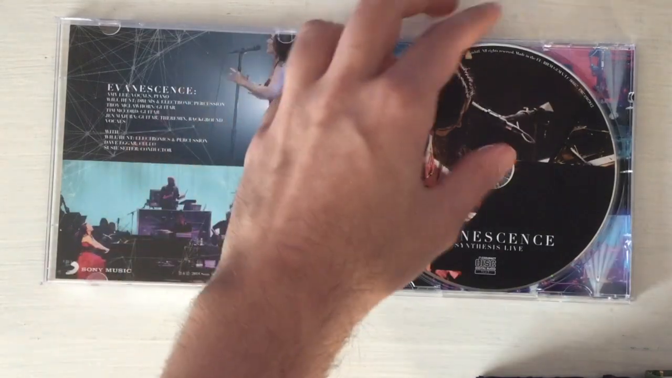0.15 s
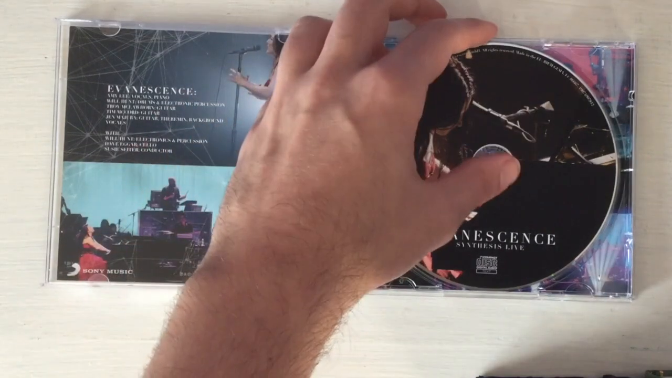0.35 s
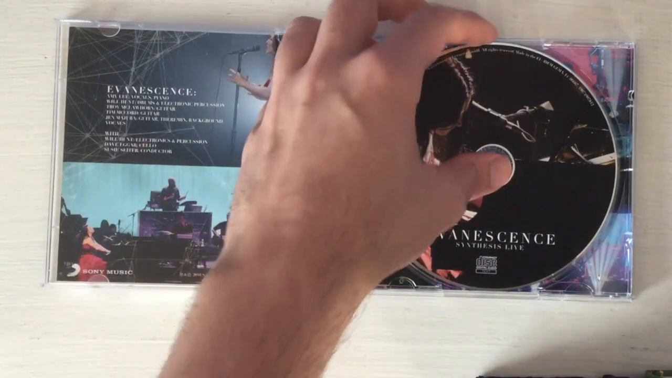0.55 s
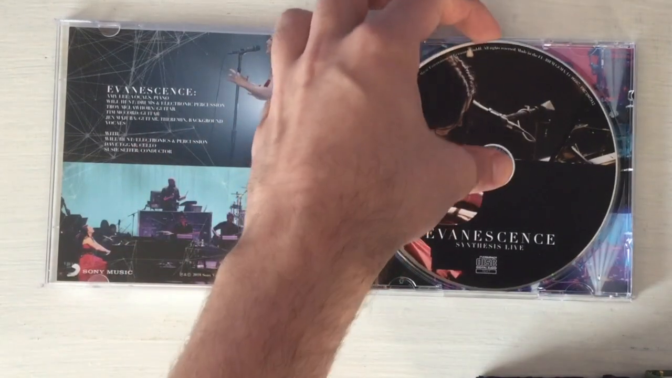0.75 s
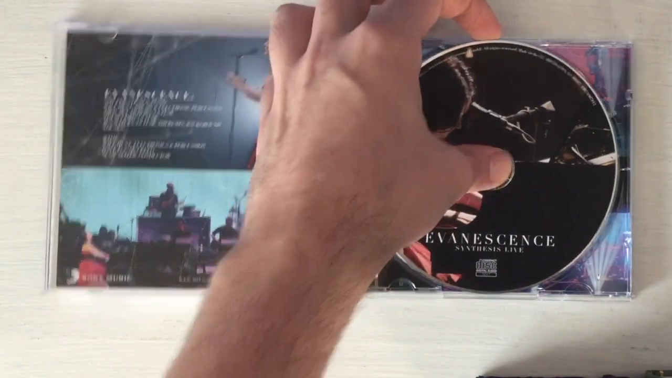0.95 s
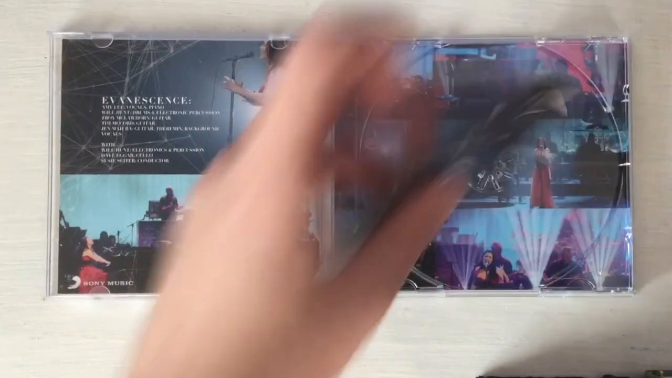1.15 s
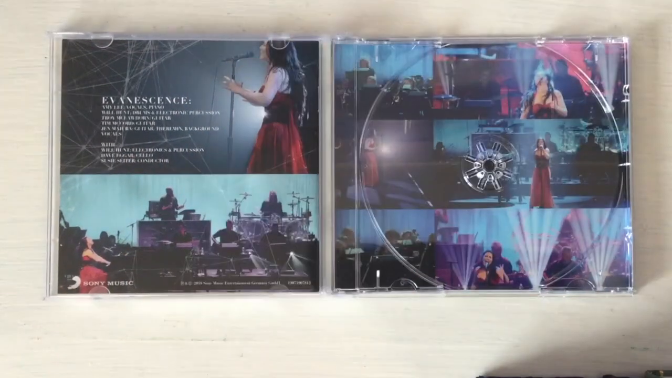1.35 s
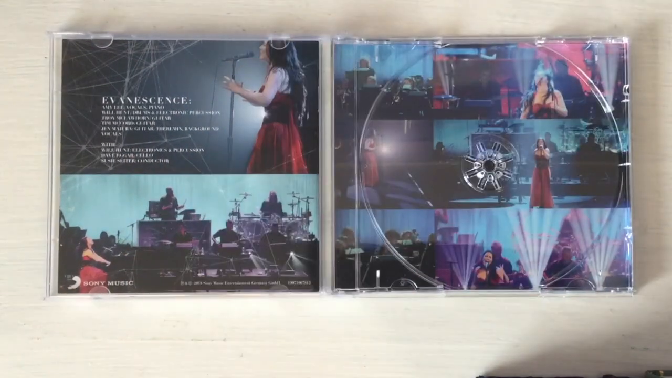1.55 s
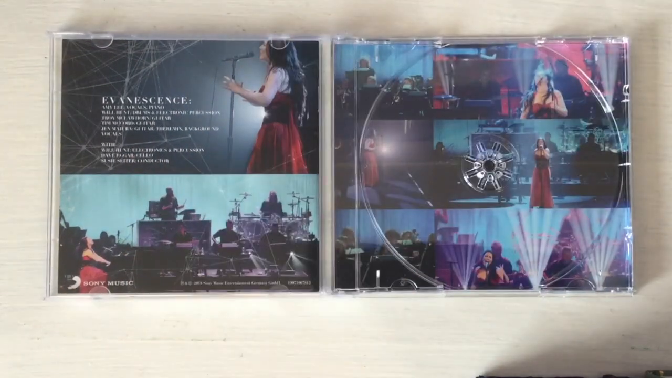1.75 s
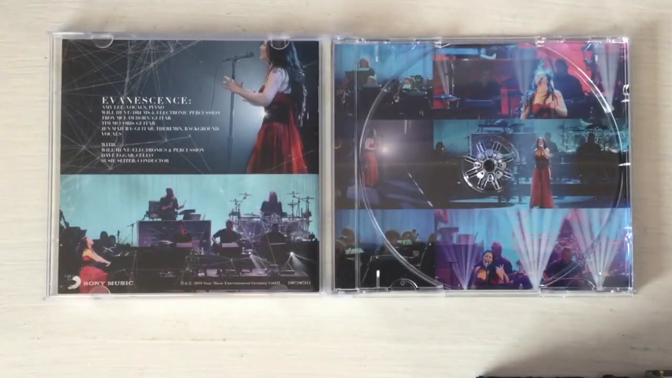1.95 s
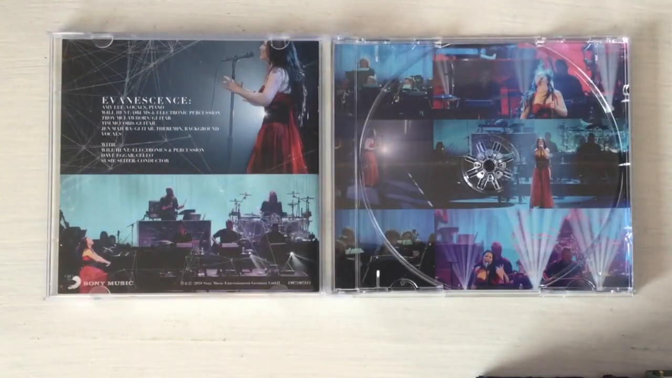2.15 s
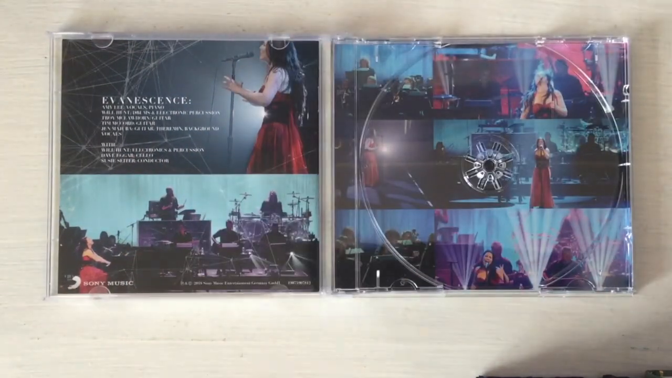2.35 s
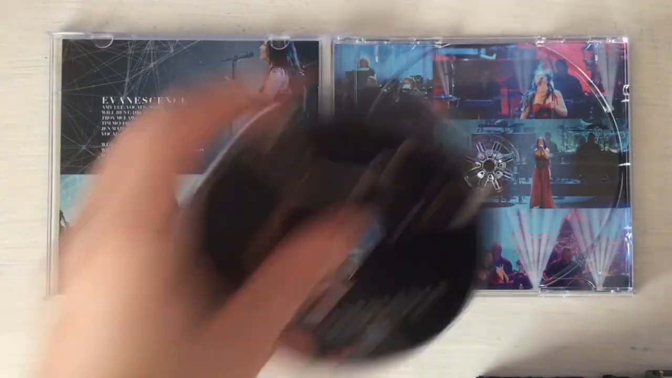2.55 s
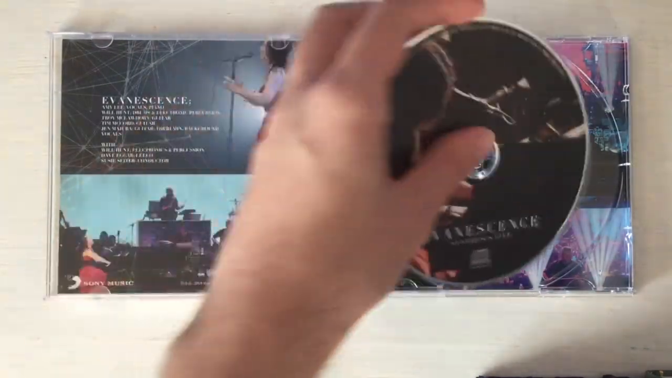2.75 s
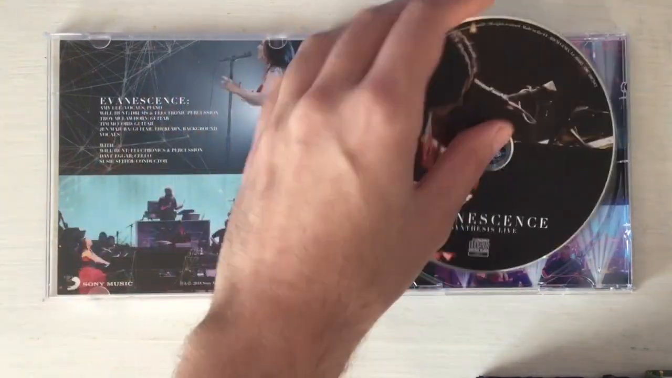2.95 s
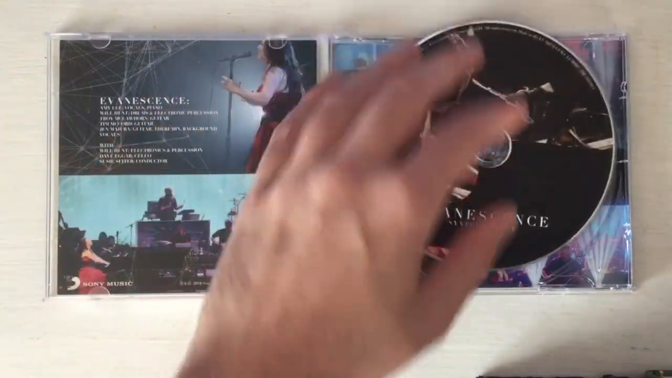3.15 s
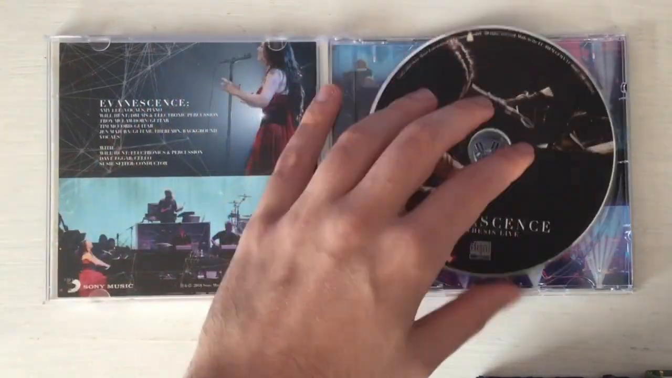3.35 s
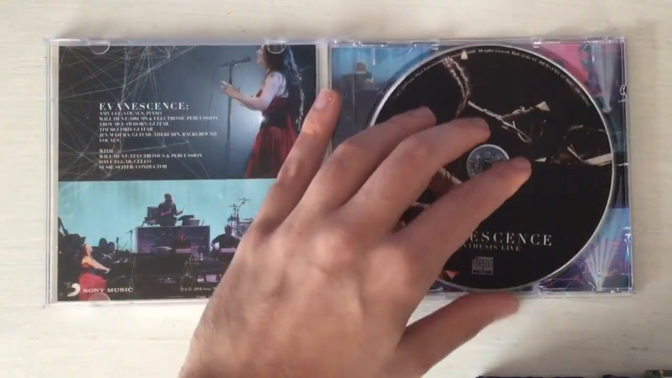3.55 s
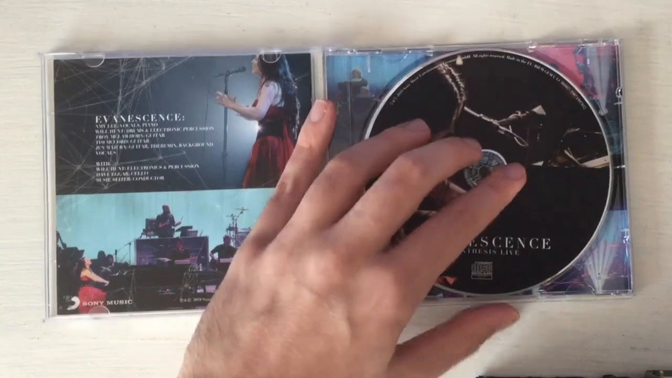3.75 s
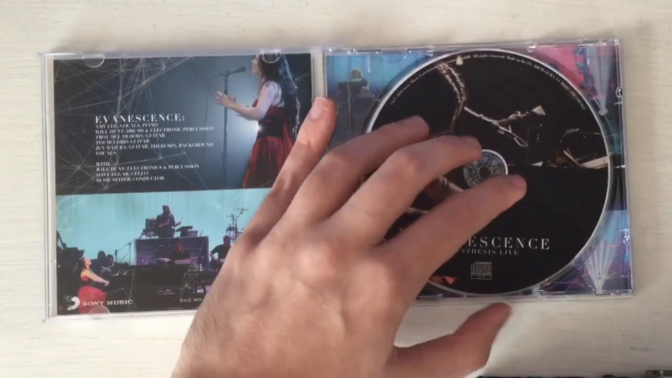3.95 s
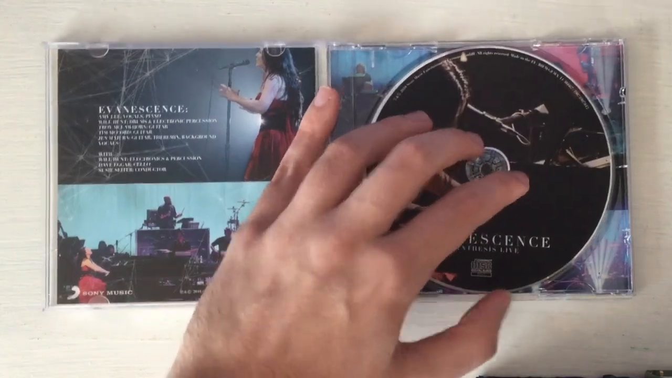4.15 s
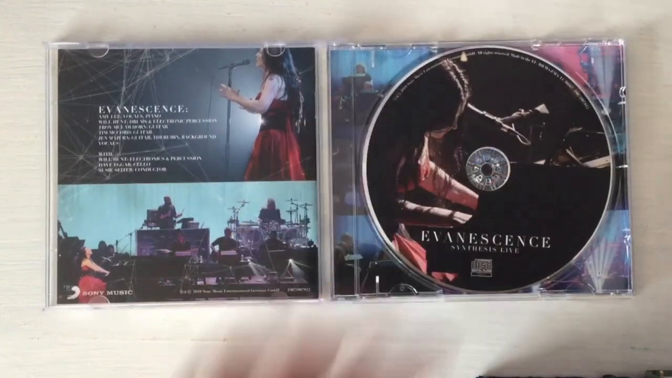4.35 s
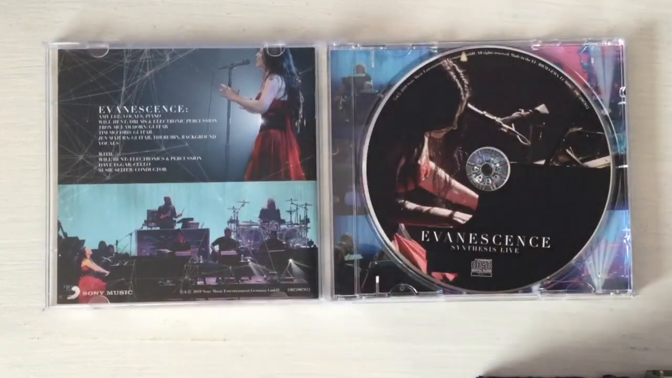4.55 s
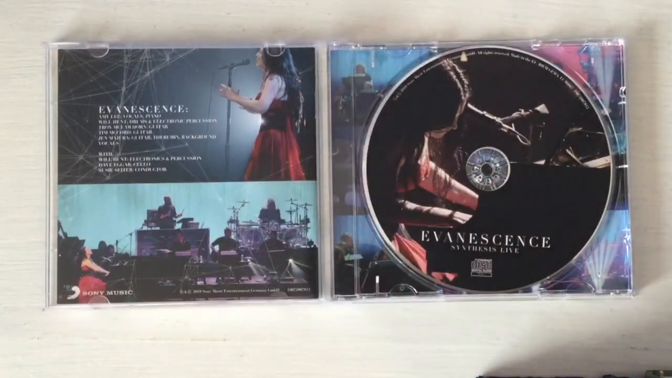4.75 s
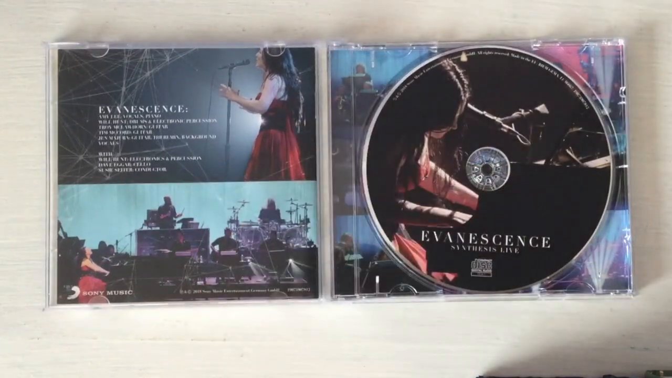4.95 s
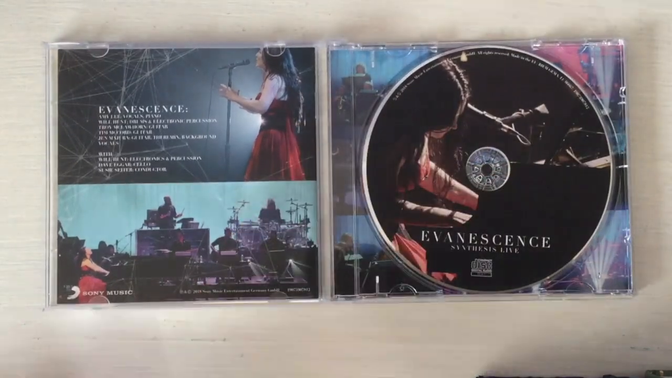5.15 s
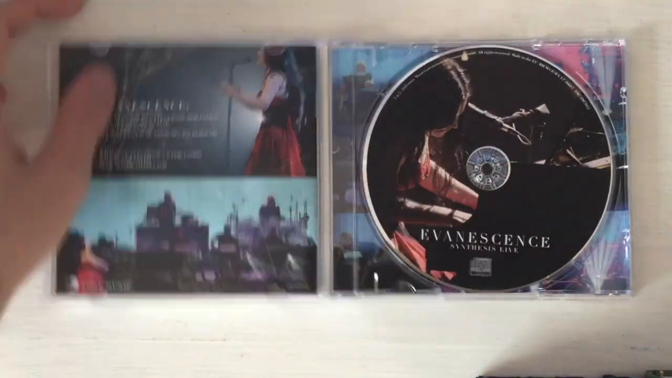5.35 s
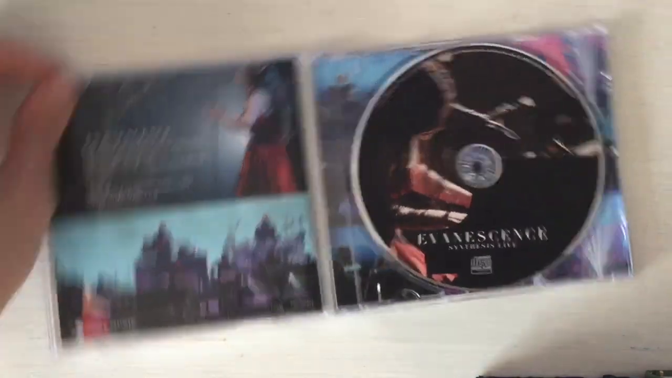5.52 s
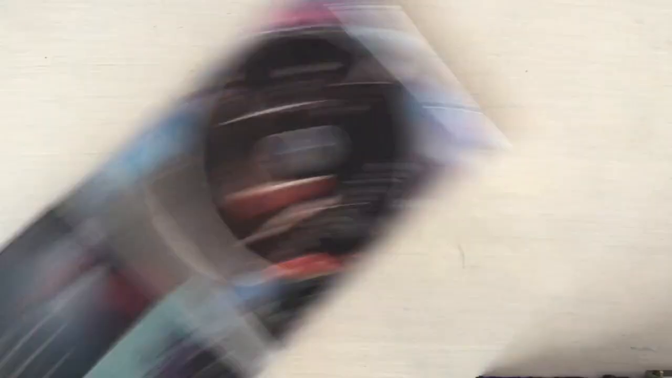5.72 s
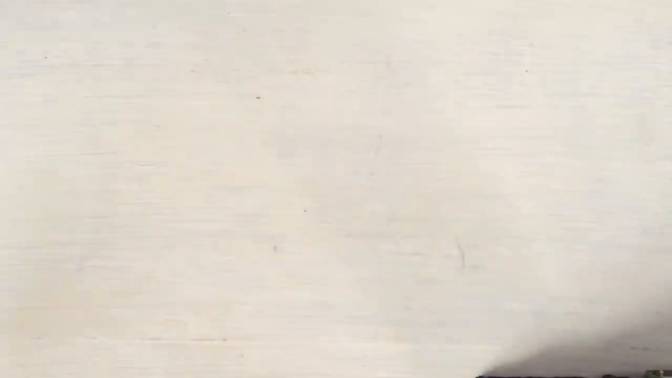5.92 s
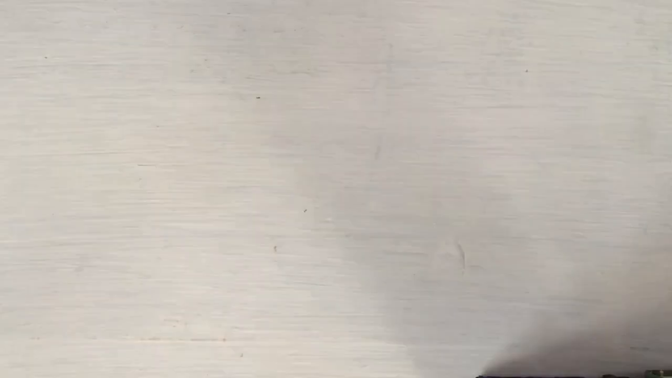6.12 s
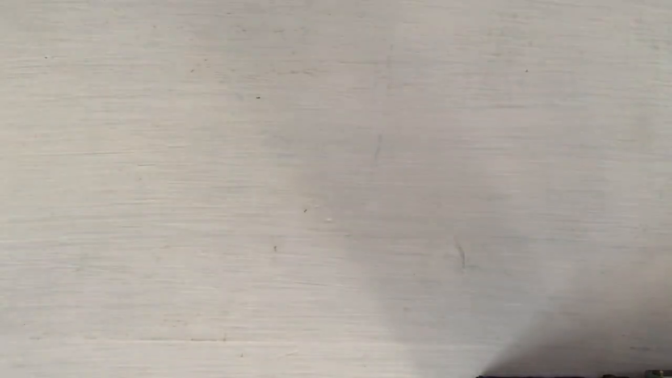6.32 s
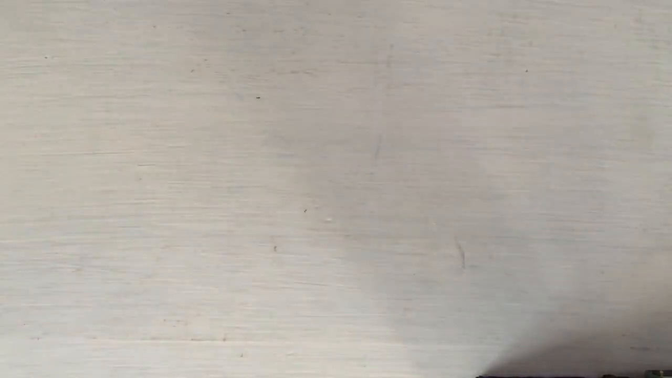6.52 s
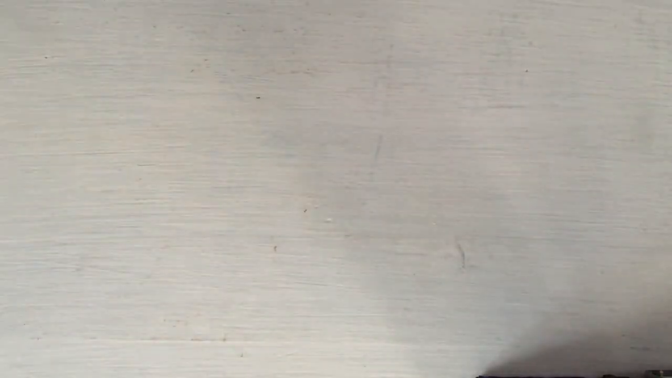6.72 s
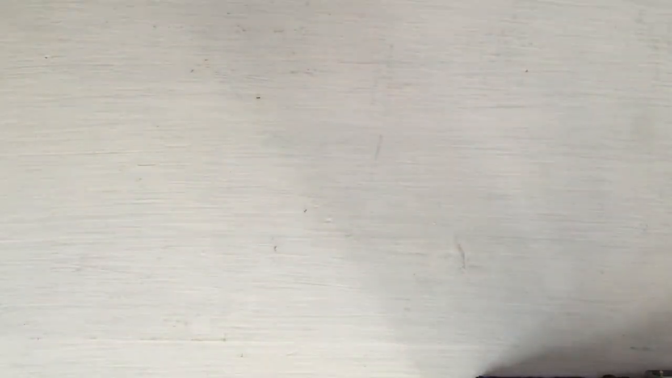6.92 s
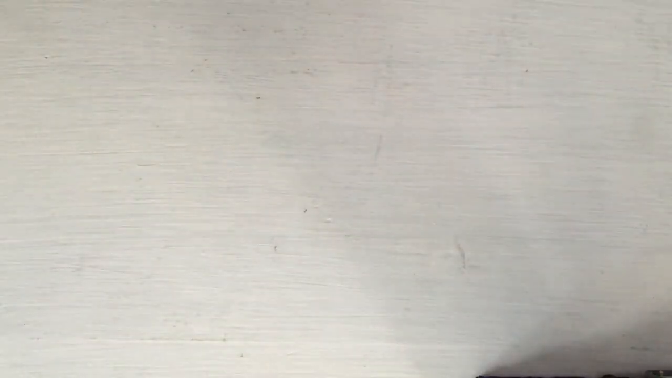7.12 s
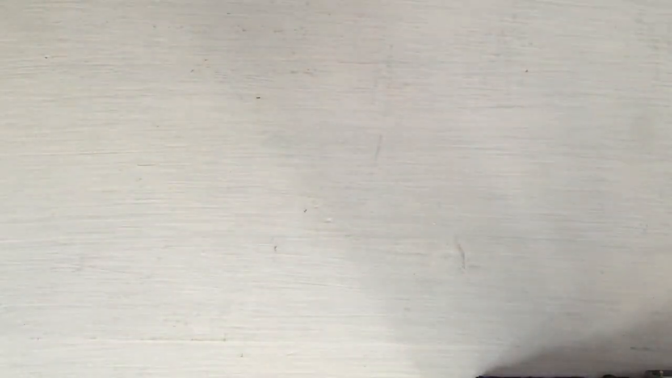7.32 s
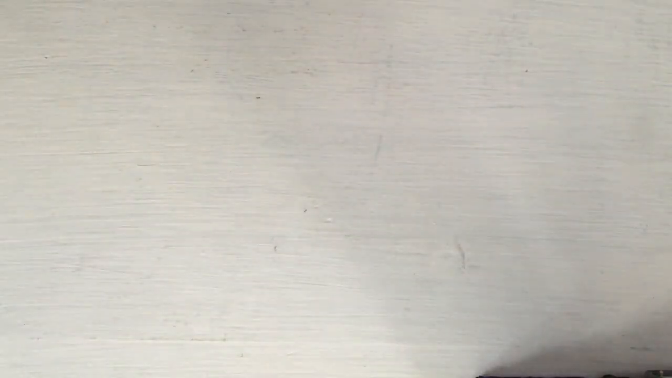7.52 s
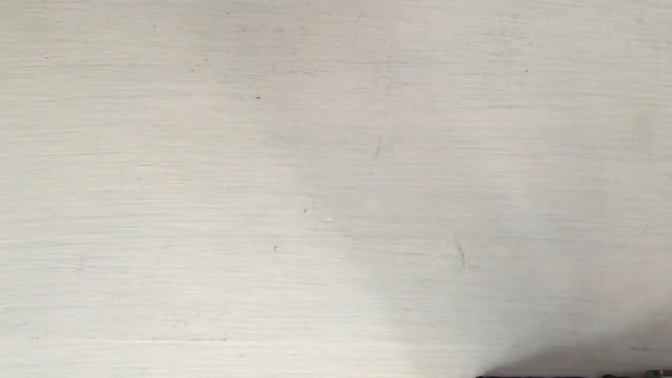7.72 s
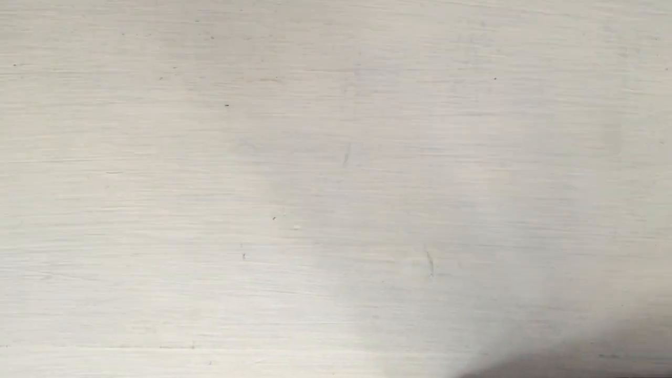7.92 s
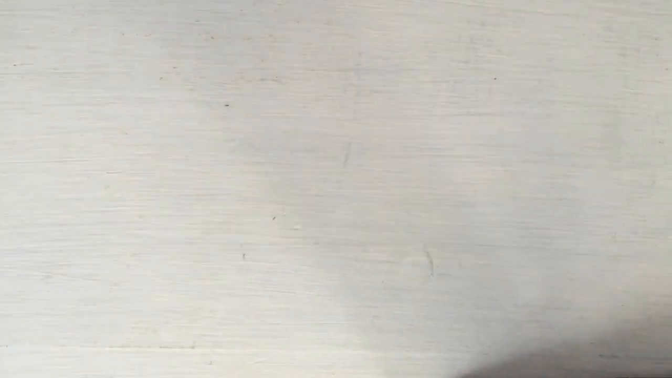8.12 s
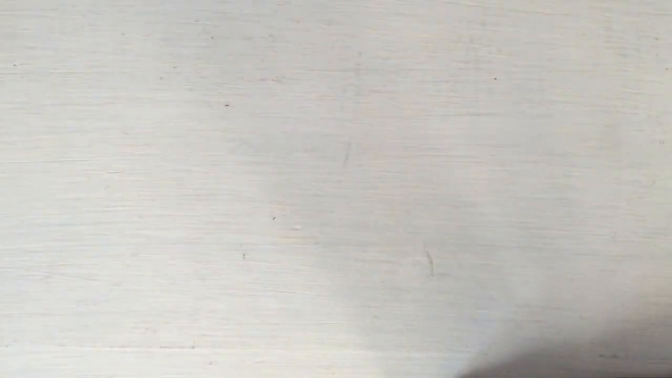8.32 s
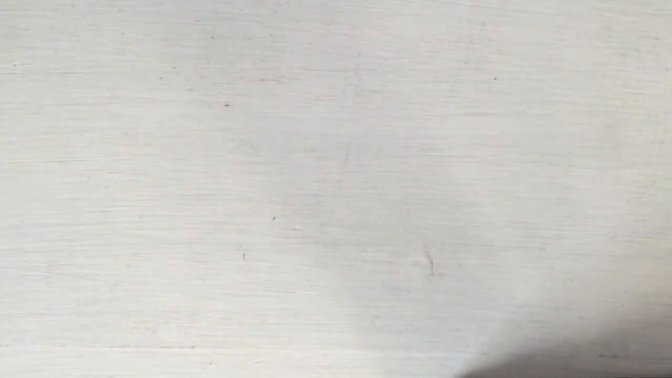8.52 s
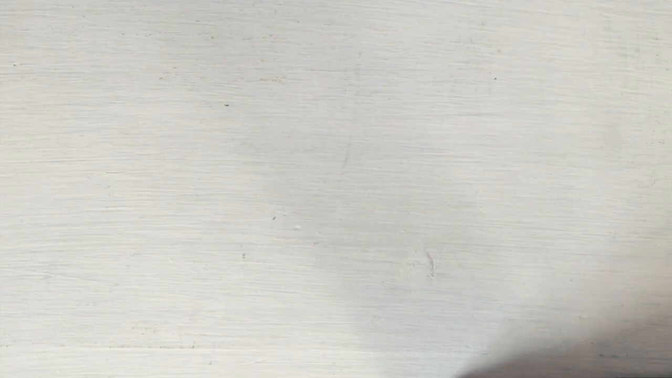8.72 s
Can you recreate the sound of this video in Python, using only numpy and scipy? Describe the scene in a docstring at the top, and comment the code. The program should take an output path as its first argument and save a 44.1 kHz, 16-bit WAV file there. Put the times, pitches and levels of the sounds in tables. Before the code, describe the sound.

A steady low fan hum with soft hiss lies behind dry, close handling of a hard plastic disc case. A small cluster of clicks releases the disc; near-silence follows, then a cracking snap, table thump and clattering ticks seat it again. After another lull, a short gritty scrape brightens and swells as the case leaves the wooden table, trailing into sparse, quieter clicks and finger scuffs. Short, small-room reflections.

```python
"""Plastic clicks of a disc case close to the microphone: a hand lifts a disc off the hub, presses it back,
drags the case off a wooden table and turns it over away from the microphone. Clicks are decaying noise
bursts plus a ringing part; thumps excite low modes of the table top; the scrape and the scuffs of fingers
and case are coloured grains. Behind, in a small room, a fan hums low and hisses, both of filtered noise."""
import sys
import numpy as np
from scipy import signal
from scipy.fft import rfft, irfft, next_fast_len
from scipy.io import wavfile
from scipy.ndimage import uniform_filter1d

SR = 44100
rng = np.random.default_rng(int(sys.argv[2]) if len(sys.argv) > 2 else 0)


def materialize(psi):
    """Save the field psi as 16-bit PCM at rate SR to the path in sys.argv[1].

    A 1-D psi becomes a single channel; in a 2-D psi each row is a channel.
    """
    bounded = np.clip(np.atleast_2d(psi).T, -1, 1)
    quanta = np.round(bounded * 32767).astype(np.int16)
    wavfile.write(sys.argv[1], SR, quanta)


N = 391608


def from_db(db):
    """Convert dB to gain."""
    return 10 ** (np.asarray(db) / 20)


def rms_one(x):
    """Scale to rms 1."""
    return x / np.sqrt(np.mean(x ** 2) + 1e-20)


def peak_one(x):
    """Scale to peak 1."""
    return x / (np.max(np.abs(x)) + 1e-20)


def band(x, low_hz, high_hz):
    """Butterworth band-pass."""
    sos = signal.butter(2, [low_hz, high_hz], "band", fs=SR, output="sos")
    return signal.sosfilt(sos, x + 1e-18)


def low_pass(x, limit_hz):
    """Butterworth low-pass, 12 dB per octave."""
    return signal.sosfilt(signal.butter(2, limit_hz, fs=SR, output="sos"), x)


def decay(t, t60):
    """Exponential fade that loses 60 dB in t60 seconds."""
    return from_db(-60 * t / t60)


def coloured(x, spectrum, peaks=()):
    """Give a steady noise a spectrum, with optional resonance bumps; rms 1."""
    size = next_fast_len(N)
    hz = np.maximum(np.arange(size // 2 + 1) * SR / size, 1)
    points = np.array(spectrum)
    level_db = np.interp(np.log(hz), np.log(points[:, 0]), points[:, 1], left=-120, right=-120)
    gain = from_db(level_db)
    for centre_hz, width_hz, lift_db in peaks:
        gain = gain * from_db(lift_db / (1 + (2 * (hz - centre_hz) / width_hz) ** 2))
    return rms_one(irfft(rfft(x, size) * gain, size)[:N])


def ring(x, hz, t60):
    """Damped resonator: a unit click sets a sine of height 1 ringing."""
    r = decay(1 / SR, t60)
    w = 2 * np.pi * hz / SR
    return signal.lfilter([0, np.sin(w)], [1, -2 * r * np.cos(w), r * r], x + 1e-18)


def drift(rate_hz):
    """Slow chance: noise at every 40th sample twice through a one-pole low-pass; rms 1."""
    r = np.exp(-2 * np.pi * rate_hz * 40 / SR)
    noise = rng.standard_normal(N // 40 + 2002)
    slow = signal.lfilter([1], [1, -2 * r, r * r], noise)[2000:]   # skip the filter's start
    return np.interp(np.arange(N) / 40, np.arange(len(slow)), rms_one(slow))


# hum of the fan: (frequency [Hz], relative level per Hz [dB])
FAN_HUM = [(24, -87), (40, -16), (64, -21), (101, -24.5), (126, -9.5), (167, -1), (193, 2.5), (237, -4.5),
           (298, -8), (331, -18.5), (695, -30.5), (1000, -43.5), (1300, -64), (2200, -120)]
# hiss of the fan: (frequency [Hz], relative level per Hz [dB])
FAN_HISS = [(530, -38), (900, -36), (1080, -15), (1280, -1), (1440, -9.5), (1730, 0), (2040, -6.5),
            (2930, -4.5), (3840, -12.5), (4640, -11), (5560, -15.5), (6360, -15), (13200, -20.5)]
# resonances of the housing in the hiss: (frequency [Hz], width [Hz], lift [dB])
FAN_HOUSING = [(1360, 110, 0), (1778, 130, 4.5), (2276, 38, 9), (2870, 250, 3), (3570, 160, 2),
               (4575, 180, 3), (5100, 45, 8), (6220, 190, 10), (6890, 150, 7), (8480, 400, 8),
               (8730, 170, 1.5), (9230, 200, 8.5)]
HUM_DB, HISS_DB = -39, -59.5   # rms levels


def fan():
    """Fan behind the table: steady noise as a broad hum and a hiss coloured by the housing."""
    hum = coloured(rng.standard_normal(N), FAN_HUM)
    hiss = coloured(rng.standard_normal(N), FAN_HISS, FAN_HOUSING)
    return from_db(HUM_DB) * hum + from_db(HISS_DB) * hiss


def room(x, t60=0.14, level_db=-15.5):
    """The small room's short diffuse tail: dying noise, dulled, as its response."""
    t = np.arange(SR // 2) / SR
    tail = rng.standard_normal(len(t)) * decay(t, t60) * (t > .004)   # starts after 4 ms
    tail = signal.lfilter([.5], [1, -.5], tail)
    tail = tail / np.sqrt(np.sum(tail ** 2))
    return from_db(level_db) * signal.fftconvolve(x, tail)[:N]


# modes of the table top: (frequency [Hz], relative level [dB], t60 [s])
TABLE_MODES = [(63, -27, 0.095), (98, 0, 0.14), (151, 14, 0.039), (270, 11, 0.036)]
# pushes on the table top: (time [s], boom peak level [dB], wooden knock peak level [dB],
# hardness of the contact as the boom's upper limit [Hz])
TABLE_THUMPS = [(0.08, -32, -51, 200), (0.779, -23, -34.5, 200), (2.766, -31, -42, 200),
                (3.004, -18.5, -27.5, 90), (3.078, -25, -32, 90), (3.478, -45, -34, 200),
                (3.881, -37, -44, 150), (5.312, -22, -50, 600), (5.32, -18, -53, 500),
                (5.34, -15.5, -29.5, 500), (5.391, -25, -56, 500), (6.038, -28, -47, 200),
                (6.138, -26.5, -38.5, 120)]


def thumps(knock_t60=0.11):
    """Pushes ring the low modes of the table top, each with a short dull knock; softer contacts boom lower."""
    size = SR // 2
    click = signal.unit_impulse(size)
    modes = sum(from_db(db) * ring(click, hz, t60) for hz, db, t60 in TABLE_MODES)
    dying = decay(np.arange(size) / SR, knock_t60)
    out = np.zeros(N + size)
    noises = rng.standard_normal((len(TABLE_THUMPS), size))
    for (s, boom_db, knock_db, hard_hz), noise in zip(TABLE_THUMPS, noises):
        at = round(s * SR)
        boom = peak_one(low_pass(modes, hard_hz))
        knock = peak_one(band(noise * dying, 150, 570))
        out[at:at + size] += from_db(boom_db) * boom + from_db(knock_db) * knock
    return out[:N]


def grains(per_s, spread_db):
    """Dense slips at random times, of uneven size and random sign; rms 1."""
    sizes = from_db(spread_db * np.minimum(rng.exponential(1, N), 5))
    sizes = sizes * rng.choice([-1, 1], N)
    return rms_one(sizes * (rng.random(N) < per_s / SR))


def in_time(rows):
    """Level and colour of one stroke as curves; silent outside its rows."""
    s, level_db, centre_hz = np.transpose(rows)
    t = np.arange(N) / SR
    gain = from_db(np.interp(t, s, level_db, left=-200, right=-200))
    return gain, np.interp(t, s, centre_hz)


# spectrum of sliding plastic: (frequency [Hz], relative level per Hz [dB])
SLIDE_SPECTRUM = [(240, -58), (400, -6), (572, 2), (867, -6.5), (1330, 1), (1990, -1), (2180, 1.5),
                  (2380, -3), (4010, -3.5), (8700, -3), (12800, -12), (14000, -57.5)]
# resonances of the case stirred by sliding: (frequency [Hz], width [Hz], lift [dB])
CASE_RESONANCES = [(1330, 41, 12), (1750, 103.3, 3), (2218, 88, 0.5), (2720, 100, 3.5), (3090, 150, 5),
                   (3985, 160, 6), (4420, 60, 3.5), (5070, 120, 3), (5700, 260, 4), (6600, 130, 2),
                   (6750, 70, 2), (8860, 110, 9.5)]


def friction(strokes, per_s, spread_db, focus_db, patchy_db):
    """Stick-slip grains in the colour of the case, gathered round a moving centre; each quarter octave
    flickers as the contact changes."""
    slips = coloured(grains(per_s, spread_db), SLIDE_SPECTRUM, CASE_RESONANCES)
    gain, centre = np.zeros(N), np.full(N, 4000.)
    for rows in strokes:
        level, hz = in_time(rows)
        gain += level
        # a stroke louder than the sum of those before it sets the colour
        centre = np.where(2 * level > gain, hz, centre)
    gain = uniform_filter1d(gain, size=220)   # smooth starts and stops over 5 ms
    edges = 420 * 2 ** (np.arange(21) / 4)   # quarter octaves [Hz]
    out, power = 0, 0
    for low, high in zip(edges, edges[1:]):
        part = band(slips, low, high)
        octaves = np.log2(np.sqrt(low * high) / centre)
        shape = from_db(-focus_db * np.minimum(octaves ** 2, 3.0))
        flicker = from_db(patchy_db * drift(35))
        out = out + shape * part * flicker
        power = power + shape ** 2 * np.mean(part ** 2)
    return gain * out / np.sqrt(power)   # a change of colour keeps the level


# scuffs of fingers and case, with the first jerks of the drag: (time of the peak [s], peak level [dB],
# centre of the colour [Hz], swell [s], fade [s])
SCUFFS = [(0.075, -49.5, 1890, 0.038, 0.082), (0.334, -55, 1810, .03, .02),
          (0.95, -49.5, 3740, 0.046, 0.078), (1.046, -48, 1880, .016, 0.058), (2.79, -42, 1720, .01, 0.046),
          (2.97, -47, 2700, 0.041, 0.12), (3.135, -28.5, 2200, 0.016, 0.042),
          (3.184, -29.5, 2460, 0.0061, 0.024), (3.26, -36.5, 2710, 0.058, 0.027),
          (3.393, -35, 2400, 0.049, 0.018), (3.5, -43, 3500, .02, 0.043), (3.66, -53.5, 2300, .1, 0.07),
          (3.882, -38, 6000, .015, .01), (4.2, -57, 2100, .08, .06), (5.352, -33, 2800, 0.03, 0.13),
          (5.444, -33, 2500, 0.024, 0.022), (5.99, -49, 2200, 0.12, 0.19),
          (6.15, -38.5, 2600, 0.053, 0.095), (6.352, -40.5, 4340, 0.029, .04),
          (6.41, -48.5, 6350, .1, 0.11), (6.759, -41, 2390, 0.018, .05), (6.965, -53, 7000, 0.071, .02),
          (7.058, -47.5, 5000, .03, 0.05), (7.13, -50, 4500, 0.1, 0.056), (7.279, -39, 2030, 0.0088, 0.043),
          (7.789, -47, 6000, 0.023, .1), (7.85, -44, 10100, .05, 0.14), (7.919, -44.5, 3120, 0.074, 0.023),
          (7.953, -31.5, 4560, 0.031, .02), (7.991, -32.5, 7500, .015, 0.0089),
          (8.049, -47, 2400, 0.045, 0.014), (8.29, -52, 8000, 0.055, 0.069),
          (8.335, -51, 1300, 0.025, 0.074), (8.545, -50.5, 8500, 0.055, 0.097),
          (8.73, -50.5, 8000, 0.12, 0.11), (8.87, -45.5, 6500, 0.059, 0.055)]


def scuffs(depth_db=17.5):
    """Fingers and case scuff by friction: each stroke swells from depth_db under its peak and fades back."""
    strokes = []
    for s, db, hz, swell, fade in SCUFFS:
        edge_db = db - depth_db
        strokes.append([(s - swell, edge_db, hz), (s, db, hz), (s + fade, edge_db, hz)])
    return friction(strokes, per_s=10000, spread_db=3.5, focus_db=3.0, patchy_db=1.83)


# the case dragged over the wood until it leaves the table: (time [s], level [dB], centre of the colour [Hz])
CASE_DRAG = [(5.455, -51, 2500), (5.48, -32, 2850), (5.6, -29, 2980), (5.66, -22, 3440), (5.7, -23, 3920),
             (5.72, -19.5, 4530), (5.76, -20, 5800), (5.875, -15.5, 4450), (5.89, -33.5, 3800),
             (5.95, -55, 2800)]


def drag():
    """The case scrapes over the wood: one stroke of friction that brightens, then darkens as it ends."""
    return friction([CASE_DRAG], per_s=16000, spread_db=3.0, focus_db=4.5, patchy_db=1.87)


# plastic contacts: (time [s], mid peak level about 1.5-5.3 kHz [dB], low peak level about 0.9-2.3 kHz [dB],
# high peak level about 7.8-10.7 kHz [dB], pitch of the touched part [Hz], rattle t60 [s])
PLASTIC_CLICKS = [(0.0779, -42, -37.5, -57, 1380, 0.028), (0.724, -30, -37, -43, 1380, 0.034),
                  (0.7327, -31, -36, -42, 1400, 0.03), (0.743, -24, -39, -39, 1400, 0.03),
                  (0.754, -27, -32, -31, 2100, 0.058), (0.7698, -23, -42, -33, 2660, 0.03),
                  (0.7774, -20, -22, -28, 1810, 0.017), (0.9263, -44, -65, -62, 1880, 0.03),
                  (0.9594, -46, -43.5, -61, 1390, 0.057), (1.053, -46, -47.5, -59, 1620, 0.027),
                  (1.1226, -35.5, -42.5, -35.5, 1870, 0.025), (2.7586, -16, -28, -15.5, 2130, 0.021),
                  (2.763, -36, -26, -38, 1630, 0.051), (2.7817, -19.5, -31, -21.5, 1710, 0.028),
                  (2.9915, -14, -21, -22, 2170, 0.062), (2.9999, -1.5, -9, -6.5, 2220, 0.023),
                  (3.0107, -31, -17, -30, 2240, 0.018), (3.0327, -37, -43, -35, 2130, 0.03),
                  (3.05, -28, -23.5, -31, 2360, 0.044), (3.0641, -16, -25, -22, 2270, 0.04),
                  (3.0821, -18.5, -20.5, -22, 1800, 0.033), (3.108, -34, -49, -35, 3770, 0.037),
                  (3.12, -19, -24, -27, 2220, 0.03), (3.138, -42, -34, -42, 2190, 0.02),
                  (3.1586, -31, -51, -32.5, 3060, 0.024), (3.1796, -27.5, -40, -42, 2050, 0.021),
                  (3.2337, -29.5, -52, -33.5, 3130, 0.035), (3.248, -36, -54, -48, 3120, 0.03),
                  (3.3717, -36, -36, -41, 2200, 0.025), (3.3972, -34, -49, -49, 2600, 0.025),
                  (3.4376, -24.5, -36, -31, 2540, 0.03), (3.4645, -34, -39, -32, 3100, 0.047),
                  (3.476, -15.5, -22, -16.5, 2930, 0.038), (3.7268, -30, -42, -35, 2420, 0.034),
                  (3.8831, -29.5, -34, -28.5, 4040, 0.037), (4.152, -48, -64, -48.5, 1830, 0.03),
                  (5.322, -45, -53, -41, 3060, 0.03), (5.334, -41, -43, -39, 4440, 0.03),
                  (5.3392, -23.5, -45, -32, 3030, 0.04), (5.3458, -21.5, -25, -23, 1820, 0.017),
                  (5.3924, -32, -41, -44, 1360, 0.03), (5.428, -31.5, -44, -46, 2950, 0.035),
                  (5.4765, -34, -39, -51, 4120, 0.026), (5.6046, -21.5, -39, -42, 2480, 0.03),
                  (5.918, -35, -41.5, -40, 1840, 0.03), (6.0193, -31, -37, -37, 1820, 0.04),
                  (6.041, -24.5, -32.5, -32, 1820, 0.042), (6.13, -33.5, -36, -36, 3800, 0.055),
                  (6.1693, -31, -37.5, -38.5, 1830, 0.034), (6.2741, -43.5, -59, -58, 3000, 0.035),
                  (6.3081, -33, -42, -53, 2940, 0.03), (6.348, -32, -55, -32.5, 3140, 0.023),
                  (6.7576, -41, -45, -48, 1400, 0.03), (6.7898, -44, -51, -48, 1710, 0.036),
                  (7.1447, -42.5, -57, -43, 1380, 0.03), (7.2748, -34.5, -40.5, -60, 1920, 0.039),
                  (7.7777, -51, -46, -47, 1600, 0.038), (7.9436, -32, -33.5, -31, 2000, 0.048),
                  (7.9823, -39, -39, -27.5, 1620, 0.035), (8.1135, -50, -51, -50, 1260, 0.03),
                  (8.2736, -43, -46.5, -54, 1510, 0.033), (8.325, -57, -30, -62, 1370, 0.047),
                  (8.451, -51, -57, -52, 1380, 0.03)]
BUILD_UP_S = 0.0015   # every contact
PART_LOW_DB, PART_MID_DB = 0.5, -7.5   # ring of the touched part re the low or mid level


def clicks(part_cycles=25, treble_t60=0.076, uneven_db=3.0):
    """Each contact is a dying rattle of micro-impacts, heard directly and through the part that was touched."""
    size = SR // 8
    t = np.arange(size) / SR
    out = np.zeros(N + size)
    treble_loss = decay(t, treble_t60)   # plastic loses its treble first
    draws = rng.standard_normal((len(PLASTIC_CLICKS), 2, size))
    uneven = from_db(uneven_db * draws[:, 1])
    bursts = draws[:, 0] * uneven * np.minimum(t / BUILD_UP_S, 1)
    for (s, mid_db, low_db, high_db, hz, t60), burst in zip(PLASTIC_CLICKS, bursts):
        at = round(s * SR)
        burst = burst * decay(t, max(t60, .005))
        low = peak_one(band(band(burst, 883, 2290), 930, 6200))
        mid = peak_one(band(band(burst, 1310, 5300), 1540, 8100))
        high = peak_one(band(burst * treble_loss, 7800, 10660))
        crack = from_db(low_db) * low + from_db(mid_db) * mid + from_db(high_db) * high
        # the part rings down 60 dB in part_cycles periods
        part = peak_one(ring(np.diff(burst, prepend=0), hz, part_cycles / hz))
        part_db = low_db + PART_LOW_DB if hz < 2500 else mid_db + PART_MID_DB
        out[at:at + size] += crack + from_db(part_db) * part
    return out[:N]


def scene():
    """Hands and case near the microphone with the room's tail, thumps through the table, fan behind."""
    near = clicks() + drag() + scuffs()
    return (near + room(near) + thumps() + fan())[None]


def record(dry, bass_cut_hz=74, top_cut_hz=16000):
    """A small microphone loses the deep bass; peaks clip; the top is cut."""
    thin = signal.sosfilt(signal.butter(4, bass_cut_hz, "high", fs=SR, output="sos"), dry)
    clipped = np.clip(thin, -1, 1)
    return signal.sosfilt(signal.cheby2(14, 90, top_cut_hz, fs=SR, output="sos"), clipped)


dry = scene()
out = record(dry)
materialize(out)
```